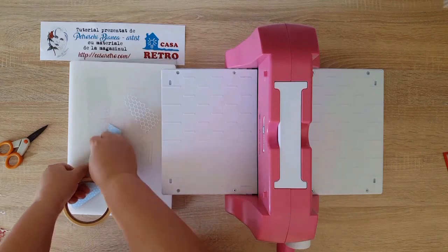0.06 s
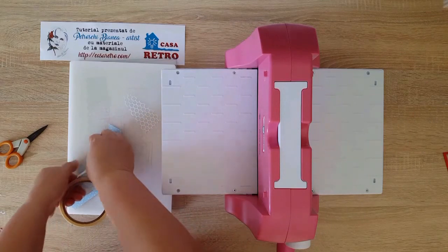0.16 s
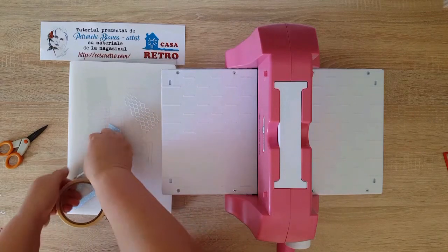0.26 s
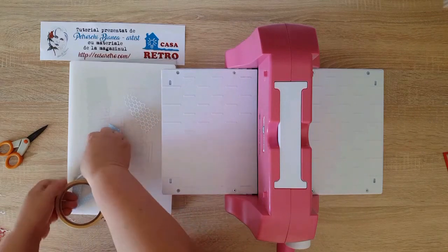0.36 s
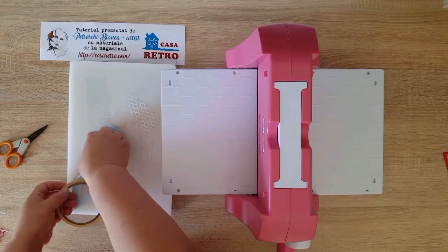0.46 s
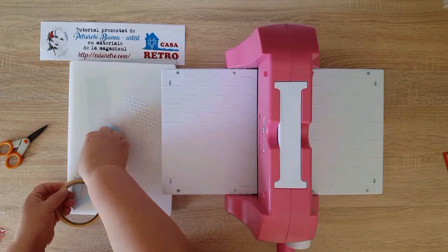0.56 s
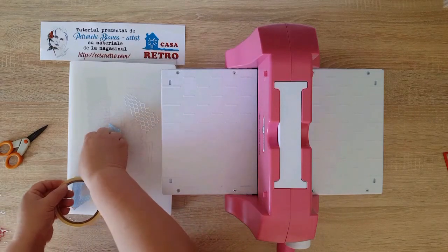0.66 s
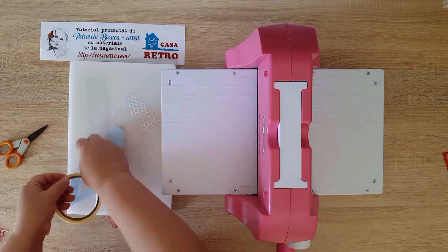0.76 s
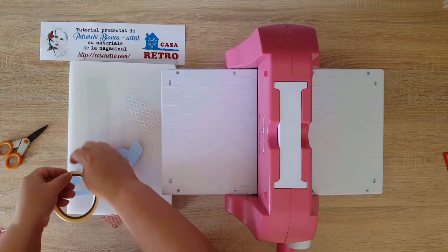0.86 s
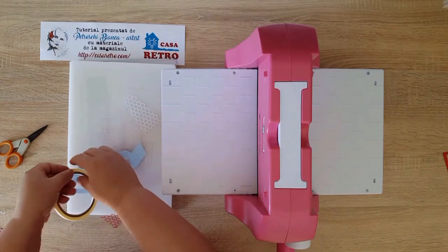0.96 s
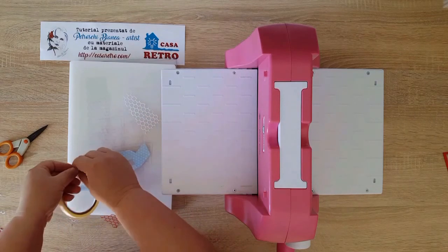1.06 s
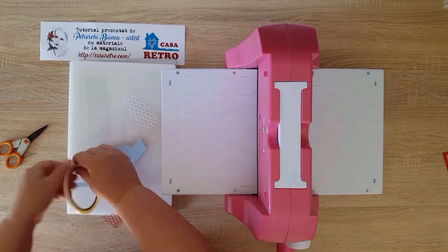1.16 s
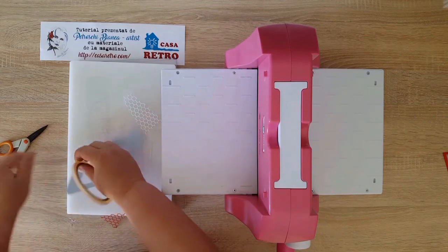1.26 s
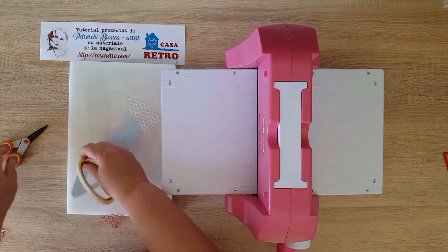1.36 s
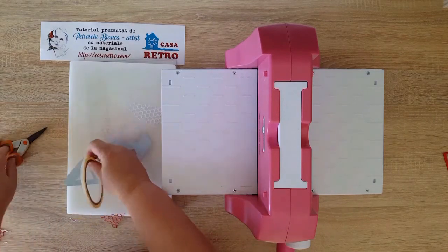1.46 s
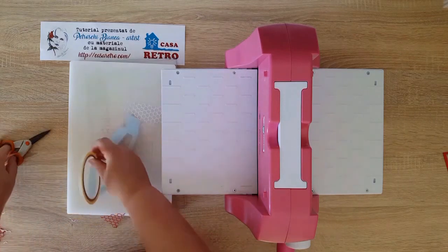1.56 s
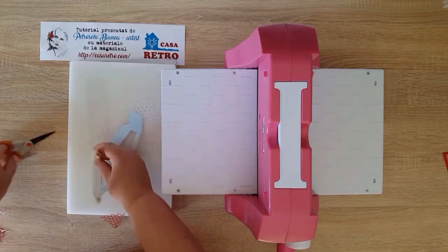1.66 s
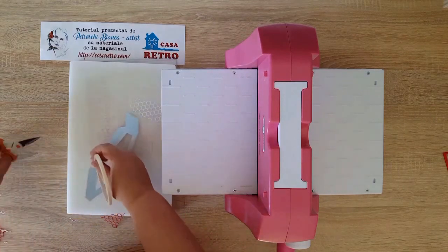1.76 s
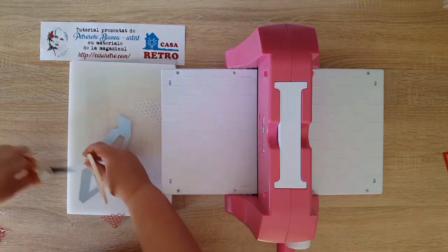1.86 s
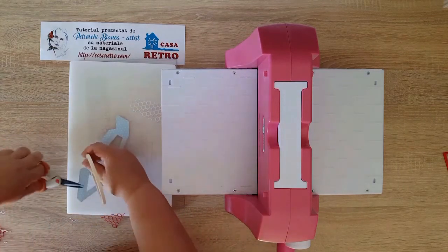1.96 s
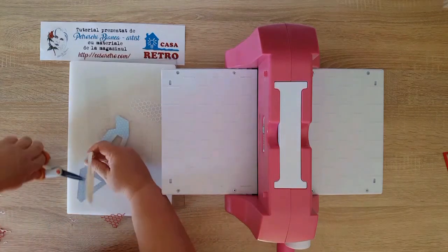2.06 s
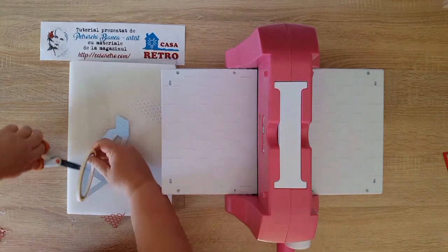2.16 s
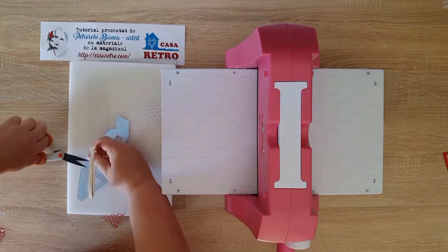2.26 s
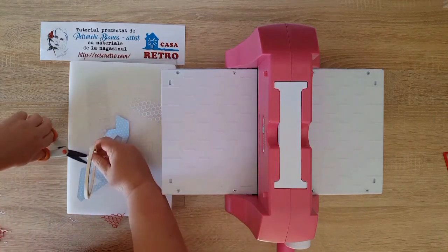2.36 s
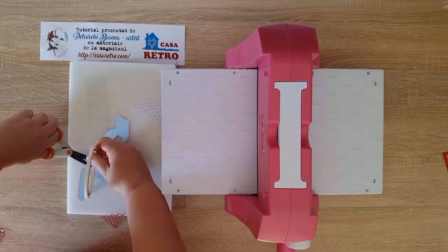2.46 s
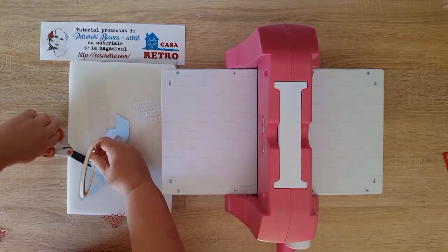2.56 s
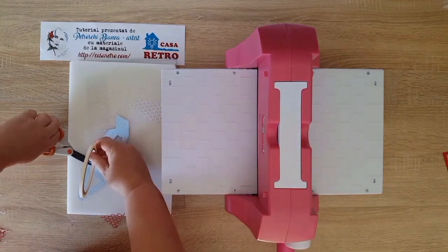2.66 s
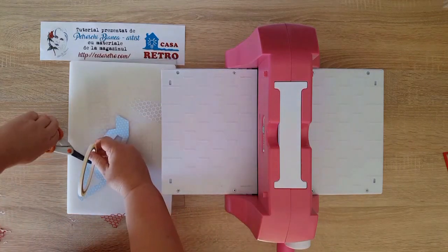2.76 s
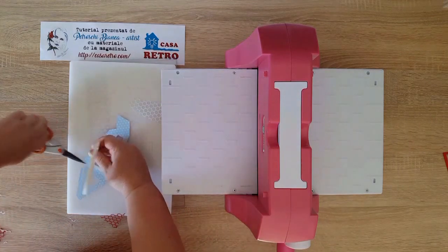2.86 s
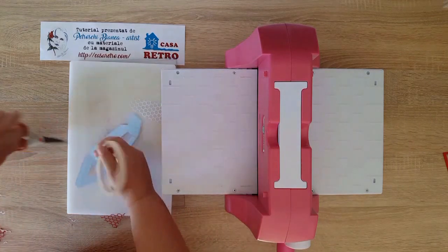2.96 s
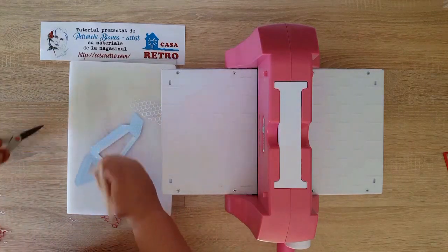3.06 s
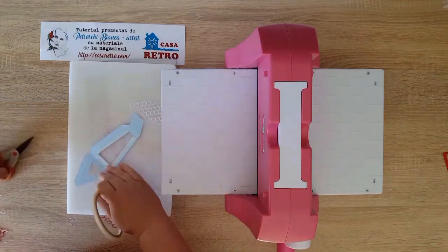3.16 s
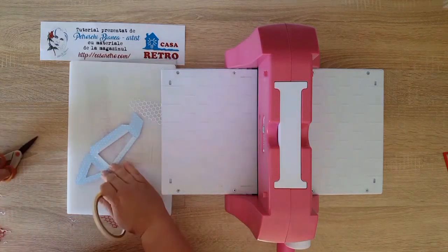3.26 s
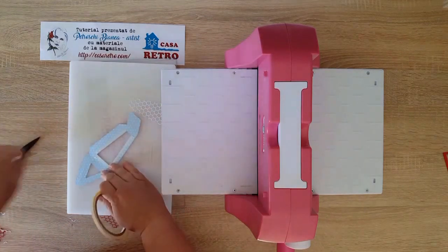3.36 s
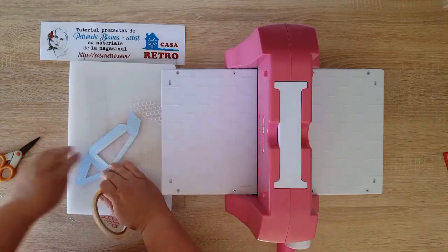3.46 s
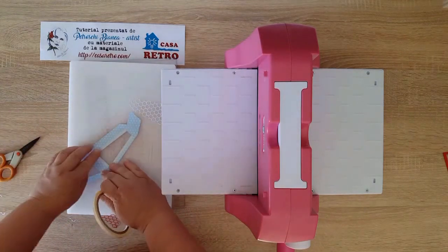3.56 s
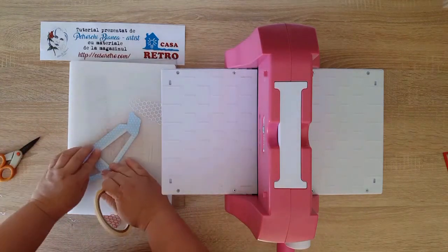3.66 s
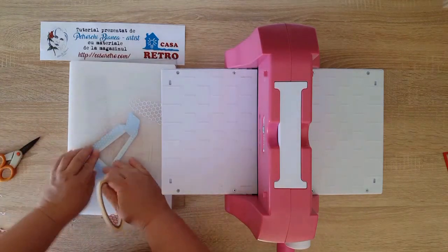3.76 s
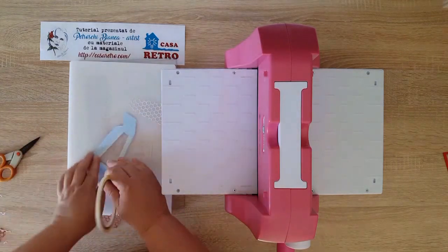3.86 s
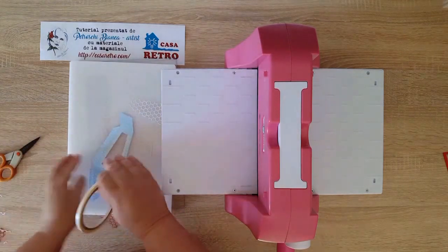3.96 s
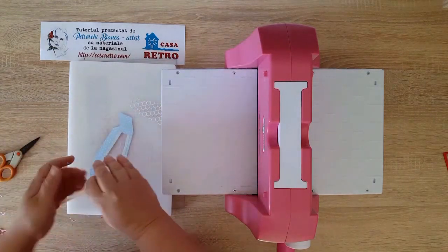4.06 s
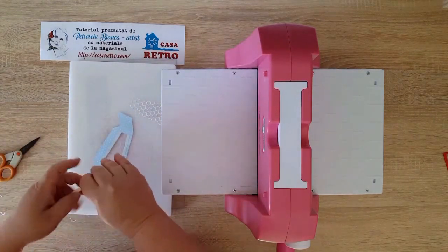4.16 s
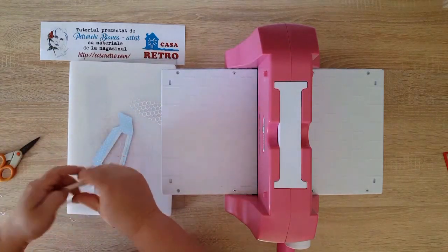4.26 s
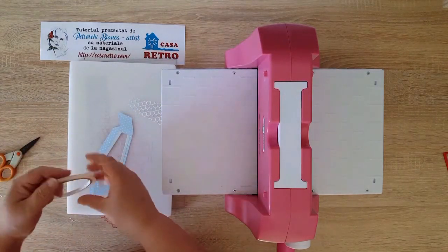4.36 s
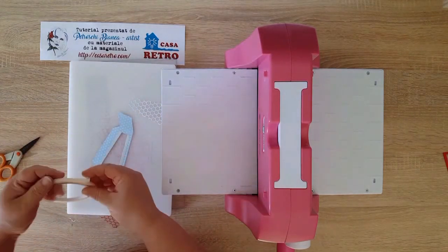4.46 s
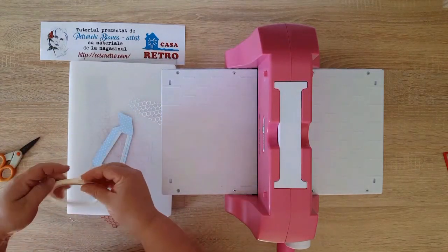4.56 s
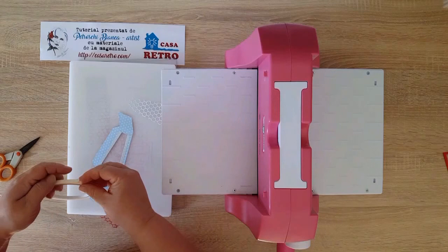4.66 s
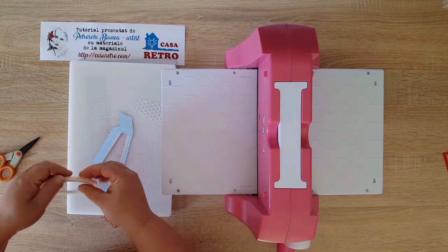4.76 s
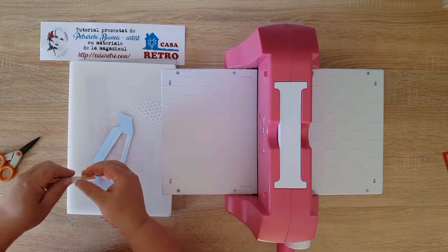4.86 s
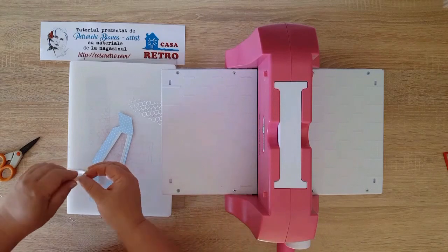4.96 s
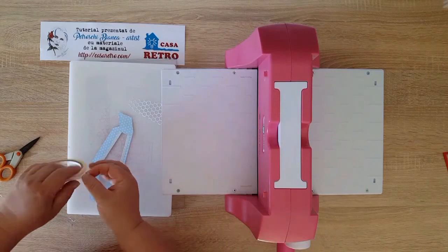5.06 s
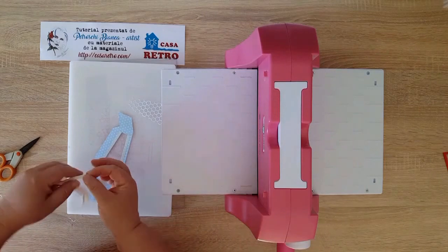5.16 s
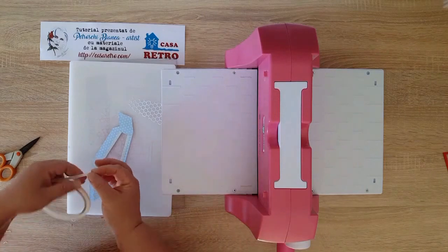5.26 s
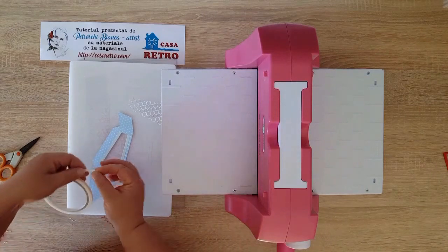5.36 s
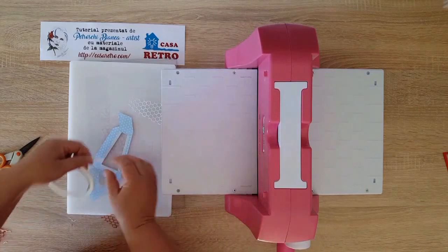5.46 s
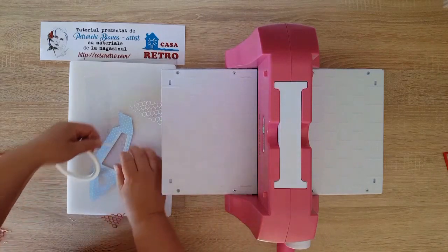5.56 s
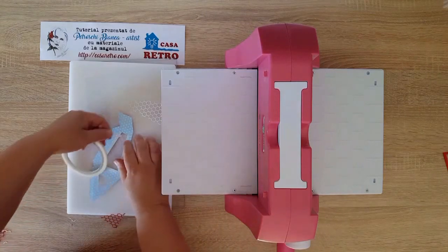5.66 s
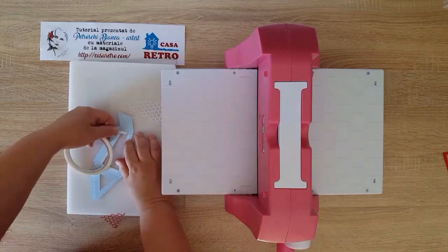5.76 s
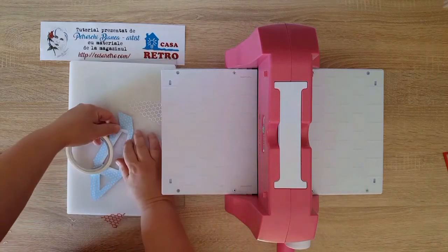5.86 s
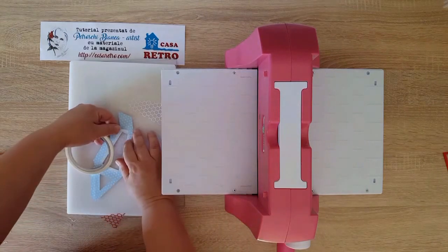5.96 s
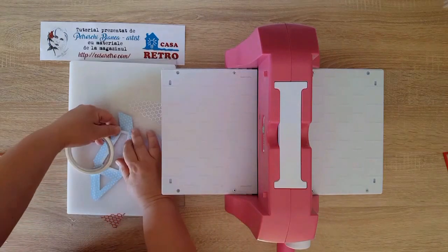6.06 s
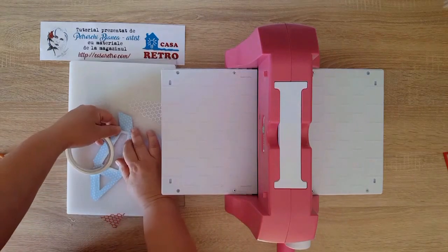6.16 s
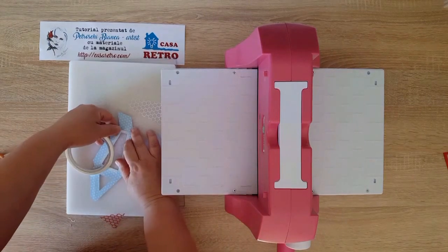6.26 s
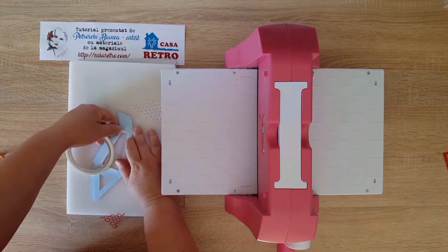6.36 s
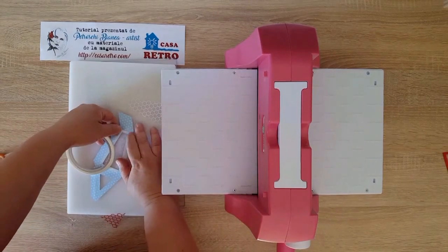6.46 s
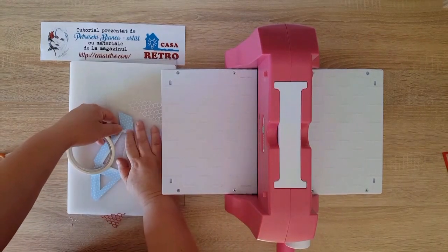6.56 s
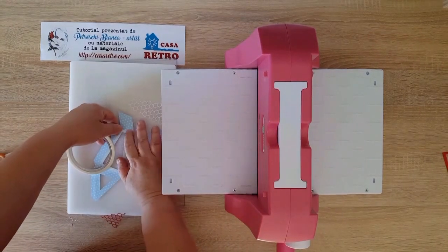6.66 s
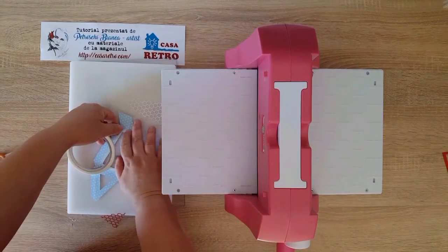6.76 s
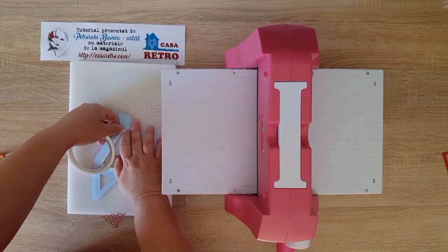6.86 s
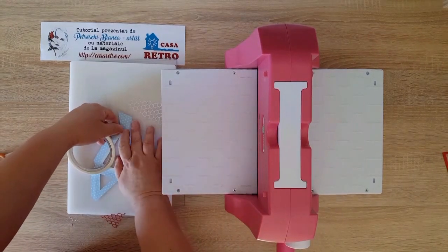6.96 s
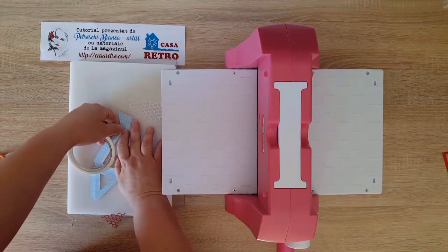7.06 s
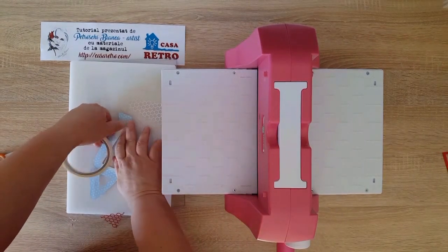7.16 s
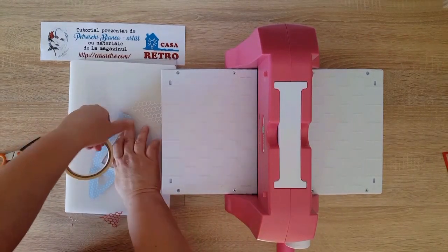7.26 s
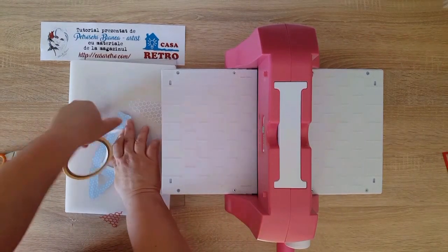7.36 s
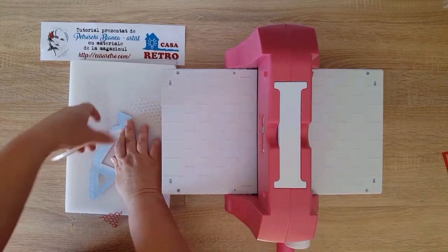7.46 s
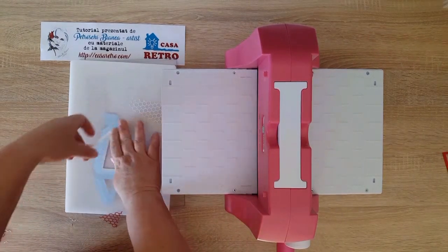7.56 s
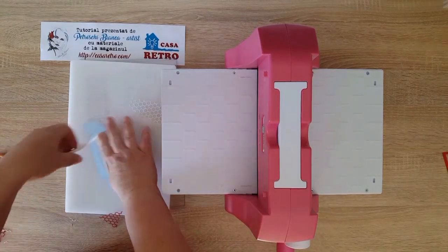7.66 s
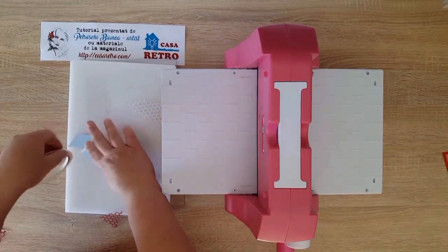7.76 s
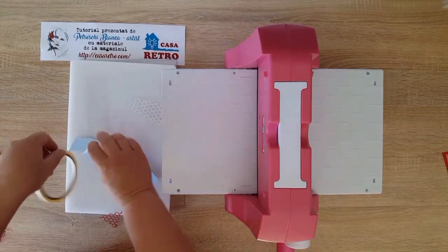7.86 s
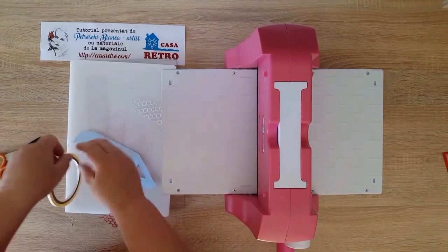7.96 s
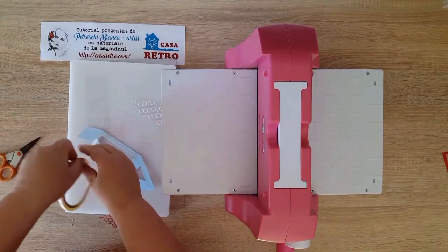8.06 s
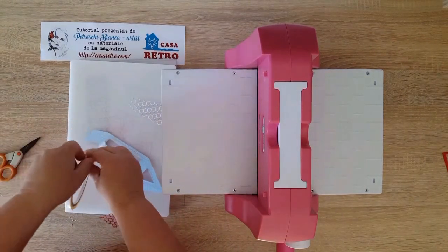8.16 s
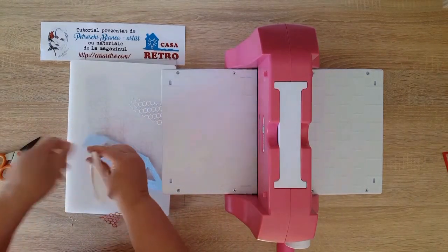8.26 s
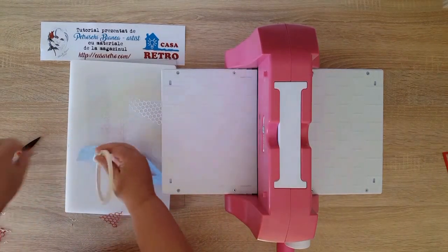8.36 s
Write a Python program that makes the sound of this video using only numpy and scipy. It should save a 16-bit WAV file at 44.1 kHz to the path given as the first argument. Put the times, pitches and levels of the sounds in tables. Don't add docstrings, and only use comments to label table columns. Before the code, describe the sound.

Hands peel and handle sticky tape in a quiet room, with soft table thuds, a bright scissor clatter, and late crisp rustles.

```python
import sys
import numpy as np
from scipy import signal
from scipy.fft import rfft, irfft
from scipy.io import wavfile
from scipy.ndimage import uniform_filter1d

SR = 44100
rng = np.random.default_rng(int(sys.argv[2]) if len(sys.argv) > 2 else 0)


def field_ratio(decibels):
    return 10 ** (np.asarray(decibels, dtype=float) / 20)


def master_out(mix):
    frames = np.transpose(np.atleast_2d(mix))
    ceiling = np.clip(frames, -1, 1)
    pcm = np.round(ceiling * 32767).astype(np.int16)
    wavfile.write(sys.argv[1], SR, pcm)


N = 370440


def evened(x):
    return x / np.sqrt(np.mean(x ** 2) + 1e-20)


def read(points, hz):
    f, value = np.transpose(points)
    return np.interp(np.log(hz + 1), np.log(f + 1), value)


def add(mix, s, sound, peak_db):
    part = mix[round(max(s, 0) * SR):][:len(sound)]
    scaled = field_ratio(peak_db) * sound / abs(sound).max()
    part += scaled[:len(part)]


def colour(x, points):
    return evened(irfft(rfft(x) * field_ratio(read(points, np.fft.rfftfreq(N, 1 / SR))), N))


def resonate(x, hz, width):
    r = np.exp(-np.pi * abs(width) / SR)
    return evened(signal.lfilter([1, 0, -1], [1, -2 * r * np.cos(2 * np.pi * hz / SR), r * r], x))


def ring(modes, rise_s):
    t = np.arange(SR // 2) / SR
    out = np.zeros(len(t))
    for hz, db, t60 in modes:
        out += field_ratio(db - 60 * t / abs(t60)) * np.sin(2 * np.pi * hz * t)
    return (1 - np.exp(-t / abs(rise_s))) * out


def grains(per_s, spread_db, smooth):
    clumps = evened(uniform_filter1d(rng.standard_normal(N), size=300))
    sizes = field_ratio(spread_db * np.minimum(rng.exponential(1, N), 3))
    slips = (rng.random(N) < per_s / SR) * rng.standard_normal(N) * sizes
    return evened((evened(slips) + smooth * rng.standard_normal(N)) * field_ratio(1.8 * clumps))


def gestures(rows, rest_db):
    t = np.arange(0, N + 64, 64) / SR
    power = field_ratio(2 * rest_db(t))
    for s, db, rise, fall in rows:
        slope = np.maximum((s - t) / abs(rise), (t - s) / abs(fall))
        power = power + field_ratio(2 * (db - 20 * slope))
    return np.interp(np.arange(N) / SR, t, np.sqrt(power))


# frequency in Hz, density in dB per Hz.
RUSTLE_SPECTRUM = [(900, -30), (1800, -12), (3500, -6), (5500, -3), (7200, 0), (9500, -3), (12000, -2),
                   (14300, -6), (15500, -12)]
SCRAPE_SPECTRUM = [(180, -33), (300, -3), (669, -7), (730, -6.5), (1550, -7.5), (2070, -5), (3600, -11),
                   (6000, -21), (7800, -49.5), (13200, -120)]
RUMBLE_SPECTRUM = [(50, -29.5), (85, -11), (128, 1.5), (170, -12), (205, 7), (270, -13), (350, -10.5),
                   (500, -26), (700, -15), (1200, -64.5)]
# time in seconds, rustle level in dB.
BUSY_HANDS = [(0, -82), (.45, -74), (.65, -80.5), (1.25, -79), (1.33, -70.5), (2.1, -74), (2.3, -82.5),
              (2.9, -85), (3.0, -77), (4.3, -74.5), (4.9, -75.5), (5.0, -85.5), (5.4, -72), (5.62, -82),
              (6.3, -77), (6.42, -92.5), (7.25, -81.5), (8.4, -87.5)]
# peak time in seconds, peak level in dB, rise and fall in seconds.
PEEL_GESTURES = [(.14, -67, 0.25, 0.16), (.37, -67, 0.19, 0.16), (.983, -58.5, 0.022, 0.15),
                 (1.025, -65, 0.14, 0.035), (1.15, -66, 0.13, 0.028), (1.51, -76, 0.25, .15),
                 (1.754, -47.5, 0.045, 0.031), (1.82, -55.5, 0.024, 0.22), (1.974, -57.5, 0.12, 0.2),
                 (2.94, -58.5, 0.013, 0.17), (3.1, -63.5, 0.036, 0.25), (3.27, -62, 0.035, 0.06),
                 (3.4, -59.5, .03, 0.15), (4.06, -69.5, 0.57, 0.18), (4.162, -53.5, 0.12, 0.083),
                 (4.72, -72, 0.18, 0.17), (5.276, -59, 0.05, 0.049), (5.33, -72, 0.096, 0.18),
                 (5.94, -65, 0.035, 0.17), (7.35, -67, .12, 0.13), (7.5, -71.5, 0.044, 0.24),
                 (7.58, -64, 0.17, 0.057), (7.65, -66, 0.1, 0.11), (7.725, -49.5, 0.012, 0.19),
                 (7.756, -46.5, 0.026, 0.044), (7.82, -57, 0.1, 0.14), (7.9, -45.5, 0.075, 0.077),
                 (7.955, -57, .04, 0.036), (8.06, -71, .1, 0.83), (8.3, -69.5, 0.092, 0.22)]
# peak time in seconds, peak level in dB, rise and fall in seconds.
RUB_GESTURES = [(.002, -63.5, 0.015, 0.89), (.13, -80, 0.11, 0.82), (1.03, -65, 0.15, 0.34),
                (1.32, -67.5, 0.1, 0.45), (1.64, -53.5, 0.031, 0.032), (1.76, -53.5, 0.15, .1),
                (1.82, -49, 0.059, 0.27), (1.97, -68.5, 0.083, 0.64), (3.12, -64.5, 0.094, 0.25),
                (3.31, -57, 0.076, 0.025), (3.42, -45, 0.044, 0.17), (3.49, -48, .05, 0.074),
                (3.9, -67.5, 0.58, 0.076), (4.16, -56.5, 0.16, 0.1), (4.9, -70, 0.25, 0.079),
                (5.29, -69, 0.21, 0.48), (5.79, -68, 0.027, 0.35), (5.94, -70.5, .03, 0.39),
                (6.3, -74.5, 0.29, 0.11), (7.5, -71.5, 0.019, .3), (7.58, -61, 0.12, 0.071),
                (7.756, -59, 0.11, 0.1), (7.9, -54.5, 0.067, 0.05), (7.98, -59.5, 0.08, .05),
                (8.07, -68.5, 0.047, 0.32)]
# peak time in seconds, peak level in dB.
LEAN_GESTURES = [(.15, -53.5), (1.68, -70), (1.82, -52.5), (2.96, -60), (3.28, -76), (3.43, -46.5),
                 (3.52, -57), (3.6, -57.5), (3.8, -70), (4.239, -59), (5.801, -71), (5.961, -67),
                 (7.55, -67), (7.66, -61), (7.78, -69.5), (7.9, -66.5)]


def hands():
    def busy(t):
        return np.interp(t, *np.transpose(BUSY_HANDS))

    def scrape_rest(t):
        return -83.5 + 0.22 * (busy(t) - BUSY_HANDS[0][1])

    leans = [(s, db, 0.23, 0.14) for s, db in LEAN_GESTURES]
    rustle = gestures(PEEL_GESTURES, busy)
    scrape = gestures(RUB_GESTURES, scrape_rest)
    rumble = gestures(leans, lambda t: -75.5 + 0 * t)
    spread = .85 * rustle * colour(rng.standard_normal((2, N)), RUSTLE_SPECTRUM)
    one_spot = .45 * rustle * colour(grains(5000, 2.2, .8), RUSTLE_SPECTRUM)
    one_spot += scrape * colour(grains(2500, 1.8, 1.3), SCRAPE_SPECTRUM)
    one_spot += rumble * colour(grains(300, 6.8, 0.7), RUMBLE_SPECTRUM)
    return one_spot, spread


def stroke(curve, body, per_s):
    s, db = np.transpose(curve)
    slips = grains(per_s, 2.5, .6)
    rung = np.zeros(N)
    for hz, width, d in body:
        rung += field_ratio(d) * resonate(resonate(slips, hz, 2 * width), hz, 2 * width)
    return evened(rung) * field_ratio(np.interp(np.arange(N) / SR, s, db, -200, -200))


# time in seconds, level in dB.
BLADE_SLIDE = [(1.45, -80), (1.46, -79), (1.514, -63), (1.542, -97), (1.564, -66), (1.715, -79),
               (1.725, -55), (1.79, -56.5)]
# frequency in Hz, width in Hz, level in dB.
BLADE_RESONANCES = [(4090, 190, 0), (5470, 5800, 0.5)]


def sliding_scissors():
    return stroke(BLADE_SLIDE, BLADE_RESONANCES, 3000)


# time in seconds, level in dB.
ROLL_DRAG = [(4.115, -71), (4.13, -58.5), (4.146, -56), (4.152, -47.5), (4.16, -43.5), (4.175, -37.5),
             (4.186, -52), (4.215, -64.5), (4.226, -50), (4.25, -67)]
# frequency in Hz, width in Hz, level in dB.
ROLL_RESONANCES = [(350, 100, -11.5), (765, 40, 1.5), (1290, 100, -7), (1620, 265, 1), (1957, 48, -4),
                   (2320, 250, -3.5), (2990, 260, -8), (3770, 200, -6.5), (5200, 1600, -9)]


def dragged_roll():
    return stroke(ROLL_DRAG, ROLL_RESONANCES, 1200)


# time in seconds, peak level in dB, ring in Hz, t60 in seconds, upper modes in dB.
THUD_BLOWS = [(.001, -40, 301, 0.29, -17), (0.095, -43.5, 293, 0.1, -4), (.118, -44, 310, 0.075, 7),
              (.534, -59, 376, 0.044, -14), (1.615, -53, 382, 0.45, -54), (1.637, -36, 404, 0.11, -13.5),
              (1.675, -45.5, 487, 0.12, -11), (1.7866, -24.5, 412, 0.059, 3.5),
              (2.756, -47.5, 366, 0.036, -12), (2.938, -44.5, 304, 0.033, -13),
              (3.234, -33.5, 416, 0.13, 4), (3.34, -26.5, 388, 0.042, -6.5),
              (3.363, -23, 406, 0.047, -15.5), (3.489, -23, 371, 0.054, 1.5),
              (3.53, -28.5, 496, 0.032, -8.5), (4.1238, -39, 395, 0.012, -9), (4.257, -47, 414, .012, 1),
              (4.224, -39, 401, .03, 11), (4.236, -42, 508, 0.045, -7), (4.245, -49.5, 71.1, 0.98, -23),
              (5.787, -47, 326, 0.022, 0), (7.478, -36, 381, 0.029, -2), (7.4795, -39.5, 145.7, 0.1, -7),
              (7.565, -52, 129.2, 0.1, -10.5), (7.612, -59, 127, .1, -9.5), (7.655, -50, 127, 0.16, -7.5),
              (7.99, -60.5, 120, 0.14, -11), (3.801, -59, 113, 0.17, -16.5),
              (7.872, -49.5, 291, 0.019, -11.5)]
# frequency ratio, level in dB, share of t60.
THUD_OVERTONES = [(1.96, 3.5, 0.45), (2.392, -0.5, 0.3), (3.098, -6, 0.54), (4.2, -5.5, 0.43)]
# frequency in Hz, level in dB, t60 in seconds.
TABLE_MODES = [(135, 1.5, 0.083), (191, -11.5, 0.075), (264.5, 7.5, 0.11), (485.6, 0, 0.1)]


def thuds():
    out = np.zeros(N)
    for s, db, hz, t60, upper_db in THUD_BLOWS:
        upper = [(hz * ratio, upper_db + d, t60 * share) for ratio, d, share in THUD_OVERTONES]
        add(out, s, -ring([(hz, 0, t60)] + upper, .0002), db)
        add(out, s, ring(TABLE_MODES, 0.0034), db - 13)
    return out


# time in seconds, peak level in dB, brightness in dB per octave,
# ring factor.
SCISSOR_CLACKS = [
    (3.3627, -12, -4.5, 0.23),
    (1.6343, -38.5, -6, 0.075),
    (1.6916, -58, 15, 0.6),
    (1.7866, -27, -9, 0.11),
    (1.8017, -33.5, 4, 0.96),
    (3.256, -55, -8, 0.38),
    (3.4858, -47, -7, 0.47),
]
# frequency in Hz, level in dB, t60 in seconds.
SCISSOR_MODES = [(1280, 0, 0.13), (1926, 2, 0.32), (2130, 14, 0.094), (2390, 9, 0.068), (2245, 7, 0.13),
                 (2970, 7, 0.049), (3455, 4.5, 0.1), (4177, -1.5, 0.12), (4558, 10, 0.01),
                 (5360, -2.5, 0.0055), (6920, -14, 0.0073), (7800, -37, 0.02), (8900, -3.5, 0.011)]


def clacks():
    out = np.zeros(N)
    for s, db, tilt_db, factor in SCISSOR_CLACKS:
        modes = [(hz, d + tilt_db * np.log2(hz / 2500), t60 * factor) for hz, d, t60 in SCISSOR_MODES]
        add(out, s, ring(modes, .0003), db)
    return out


def blows():
    floor_filter = signal.butter(2, 59.8, "high", fs=SR, output="sos")
    return signal.sosfilt(floor_filter, thuds() + clacks())


def bursts(rows):
    out, t = np.zeros(N), np.arange(SR // 8) / SR
    for s, db, hz, cycles, t60, crack_db in rows:
        noise = rng.standard_normal(len(t))
        burst = resonate(resonate(noise, hz, hz / cycles), hz, hz)
        burst += field_ratio(crack_db) * signal.lfilter([1], [1, -.45], noise)
        add(out, s, burst * field_ratio(-60 * t / abs(t60)) * (1 - np.exp(-t * 6000)), db)
    return out


# time in seconds, peak level in dB, centre in Hz, t60 in seconds,
# flat crack in dB.
CRACK_EVENTS = [(.534, -59, 680, 0.034, -6), (1.0, -46, 2580, 0.02, 1), (1.311, -45, 3780, 0.0086, 2),
                (1.5197, -46, 1660, 0.03, 19), (1.801, -23, 1940, 0.012, -1),
                (2.141, -47, 2630, 0.0085, -6), (2.9322, -36.5, 1430, 0.043, 5),
                (2.939, -35.5, 901, 0.024, 2), (2.941, -35, 2500, 0.024, 0), (3.2333, -26, 2550, 0.018, 8),
                (3.257, -28.5, 1734, 0.041, -6), (3.359, -34.5, 4500, 0.049, -9.5),
                (3.3631, -17, 4150, 0.016, -19.5), (4.124, -52, 685, 0.013, -19.5),
                (5.248, -48, 7580, 0.024, 13), (5.787, -53, 1230, 0.0065, -28.5),
                (7.478, -32.5, 994, 0.0054, 15.5), (7.7224, -42.5, 7500, .024, -9)]


def cracks():
    return bursts([(s, db, hz, 2.2, t60, crack_db) for s, db, hz, t60, crack_db in CRACK_EVENTS])


# time in seconds, peak level in dB, centre in Hz,
# t60 in seconds, cycles of ring.
TICK_EVENTS = [(.072, -54, 9000, .008, 2), (.1905, -55, 8000, .008, 1.8), (1.4297, -53, 8460, 0.015, 2.8),
               (1.508, -48, 4080, .02, 6), (0.9797, -48.5, 7900, 0.024, 9.1), (1.013, -49, 7800, .027, 2.5),
               (3.2714, -51, 1890, 0.018, 2.5), (3.327, -46, 1660, 0.026, 2.5),
               (3.362, -17, 4740, 0.007, 14), (3.764, -50, 8400, 0.016, 4.2),
               (3.942, -50, 1440, 0.061, 6.6), (4.224, -42, 1514, 0.031, 2.2),
               (4.236, -47.5, 900, 0.046, 2.7), (5.2714, -49, 3800, 0.05, 3.4),
               (5.369, -43, 3600, .012, 3.4), (5.9208, -39.5, 7300, 0.011, 2),
               (7.479, -38.5, 9100, 0.011, 5.3), (7.801, -44.5, 6960, 0.018, 3.1),
               (3.0924, -58, 4980, .012, 2), (4.719, -56.5, 10970, .01, 2), (8.305, -57, 7500, .012, 3)]


def ticks():
    return bursts([(s, db, hz, cycles, t60, -5.5) for s, db, hz, t60, cycles in TICK_EVENTS])


# time in seconds, peak level in dB, centre in Hz,
# t60 in seconds, cycles of ring.
BODY_EVENTS = [(.001, -47, 750, 0.26, 10), (.004, -53, 2040, 0.17, 9.2), (.068, -63, 1710, .12, 3.5),
               (.084, -52, 1520, 0.16, 7), (.1178, -51.5, 1420, 0.11, 9), (1.638, -54, 2100, .15, 8.6),
               (1.813, -41, 3260, 0.12, 18), (1.806, -48, 2070, 0.37, 7), (3.385, -50, 7700, 0.014, 8),
               (3.488, -45, 5100, 0.021, 7.7), (5.255, -58.5, 1290, 0.22, 0.99),
               (7.4785, -37, 2260, .025, 2.2), (2.94, -44.5, 738, 0.047, 4),
               (3.363, -13.5, 2210, .025, 2.8), (3.364, -28.5, 7000, .06, 3), (3.365, -28, 676, 0.092, 3.6),
               (7.478, -49, 4520, 0.009, 1.5)]


def bodies():
    return bursts([(s, db, hz, cycles, t60, -40) for s, db, hz, t60, cycles in BODY_EVENTS])


# time in seconds, peak level in dB, frequency in Hz, t60 in seconds.
PING_EVENTS = [(3.3626, -15, 4700, 0.0074), (3.3632, -15.5, 3350, .015), (3.3638, -17.5, 2200, 0.021),
               (3.3632, -26, 6600, 0.0079), (3.3675, -24, 4800, 0.0099), (3.3705, -20.5, 2320, .03),
               (3.372, -25, 3400, .012), (5.368, -48, 3570, .014), (5.374, -51, 3750, .016),
               (5.369, -59, 1205, .04), (5.9207, -39.5, 7280, 0.0079), (5.9207, -45, 9140, 0.0072),
               (5.9255, -50, 7300, 0.0098), (2.7565, -51, 600, .015), (5.7865, -59.5, 660, 0.013),
               (.534, -59, 630, 0.028), (1.7865, -32, 1000, 0.032), (1.7875, -35.5, 600, 0.032),
               (7.4785, -44.5, 3680, 0.0062), (7.4785, -44.5, 490, .03), (2.9385, -39, 2300, .012),
               (3.4895, -31, 410, 0.11)]


def pings():
    out = np.zeros(N)
    for s, db, hz, t60 in PING_EVENTS:
        add(out, s, ring([(hz, 0, t60)], .0004), db)
    return out


# frequency in Hz, t60 in seconds.
ROOM_T60 = [(60, 0.49), (130, 0.58), (400, 0.59), (2000, 0.53), (3300, 0.44), (5000, .35), (8000, 0.25),
            (15000, 0.14)]
# frequency in Hz, likeness from 0 to 1.
TAIL_LIKENESS = [(100, 0.65), (300, .85), (640, 0.71), (1400, .35), (3000, .02)]
# delay in seconds, level in dB over the tail.
NEAR_ECHOES = [(.0021, -4), (.0048, -4), (.0083, -7), (.0135, -9), (.0205, -10), (.029, -9)]


def room(x, wet_db, lead):
    taps = np.zeros((2, SR))
    at = np.arange(200, SR - 20, 20)
    at = at + rng.integers(0, 20, (2, len(at)))
    np.put_along_axis(taps, at, rng.choice([-1., 1.], at.shape), 1)
    hz, t, z = signal.stft(taps, SR, nperseg=512)
    same = np.clip(read(TAIL_LIKENESS, hz), 0, 1)[:, None]
    z[1] = same * z[0] + np.sqrt(1 - same ** 2) * z[1]
    decay = field_ratio(-60 * t / read(ROOM_T60, hz)[:, None])
    tail = signal.istft(z * decay, SR, nperseg=512)[1]
    tail[:, :200] = 0
    tail *= field_ratio(wet_db) / np.linalg.norm(tail[0])
    tail[0, 0] = tail[1, lead] = 1
    tail[:, 8:60] += .15 * np.diff(rng.standard_normal((2, 53))) * np.exp(-np.arange(52) / 25)
    for k, (s, db) in enumerate(NEAR_ECHOES):
        skew = rng.integers(-9, 9)
        arrivals = [round(s * SR) + skew, round(s * SR) - skew]
        tail[[0, 1], arrivals] += (-1) ** k * field_ratio(db + wet_db)
    return signal.fftconvolve(x[None], tail, axes=1)[:, :N]


# frequency in Hz, density in dB per Hz.
HISS_SPECTRUM = [(34, -36), (58, -3), (97, -10.5), (208, -7), (282, -14), (481, -16), (1280, -20.5),
                 (1370, -18.5), (1810, -22.5), (2690, -22), (9210, -35), (13400, -27.5), (15000, -42)]
# frequency in Hz, left-right likeness.
HISS_LIKENESS = [(60, 0.48), (130, 0.34), (290, 0.59), (640, 0.16), (1400, .05), (3080, .02), (14900, .02)]
# frequency in Hz, level in dB, width in Hz.
HUM_LINES = [(49.2, -72, 0.41), (190.4, -84, 5), (213, -82, 5.8), (1358, -85, 0.91), (2750, -94, 2.3)]


def floor():
    frames, hz = N // 512 + 5, np.fft.rfftfreq(2048, 1 / SR)
    a, b, c, d, patches = rng.standard_normal((frames, 1025, 5)).T
    patches = uniform_filter1d(patches, size=20, axis=0)
    patches = evened(uniform_filter1d(patches, size=8, axis=1))
    same = np.clip(read(HISS_LIKENESS, hz), -1, 1)[:, None]
    left = a + 1j * b
    right = same * left + np.sqrt(1 - same ** 2) * (c + 1j * d)
    z = np.array([left, right]) * field_ratio(read(HISS_SPECTRUM, hz)[:, None] + 1.5 * patches)
    hiss = signal.istft(z, nperseg=2048, noverlap=1536)[1][:, :N]
    out = field_ratio(-68.5) * evened(hiss)
    for hz, db, width in HUM_LINES:
        wander = evened(uniform_filter1d(rng.standard_normal(N), size=8000))
        level = np.sqrt(2) * field_ratio(db + 0.19 * width * wander[::-1])
        out += level * np.sin(2 * np.pi * np.cumsum(hz + .3 * width * wander) / SR)
    return out


# start in seconds, end in seconds.
FAR_LEFT_SPANS = [
    (1.6, 1.9),
    (2.9, 3.5),
]


def scene():
    one_spot, spread = hands()
    one_spot = one_spot + sliding_scissors()
    snaps = cracks() + ticks() + bodies() + pings()
    t = np.arange(N) / SR
    far = sum((t > a) & (t < b) for a, b in FAR_LEFT_SPANS)
    plate_lead, drag_lead, far_lead = 6, 1, 10
    near = room(one_spot + (1 - far) * snaps, -9.5, plate_lead)
    near = near + room(dragged_roll(), -9.5, drag_lead) + spread
    edge = room(blows(), -6.5, far_lead) + room(far * snaps, -8.5, far_lead)
    return near + edge + floor()


def band_limit(x):
    return signal.sosfilt(signal.butter(12, 15480, fs=SR, output="sos"), x)


def record(dry):
    low = signal.butter(2, 35, "high", fs=SR, output="sos")
    top = signal.firwin(255, 14800, window=("kaiser", 5), fs=SR)[None]
    mix = signal.oaconvolve(signal.sosfilt(low, dry), top, "same") - .0005
    return band_limit(mix)


dry = scene()
out = record(dry)
master_out(out)
```